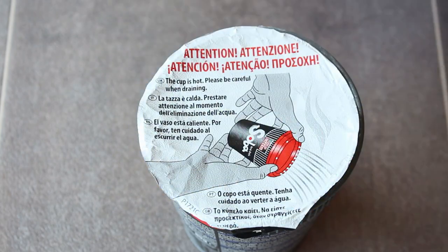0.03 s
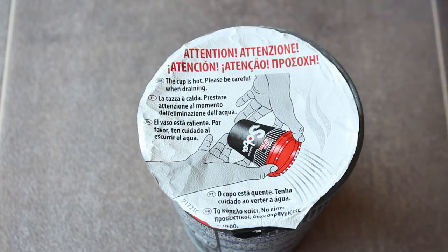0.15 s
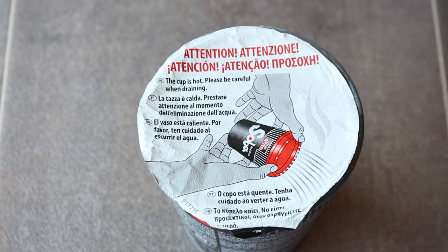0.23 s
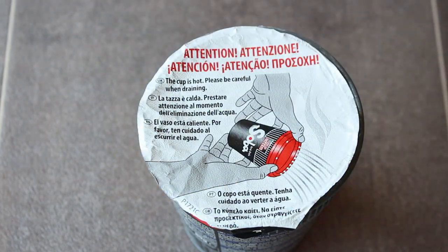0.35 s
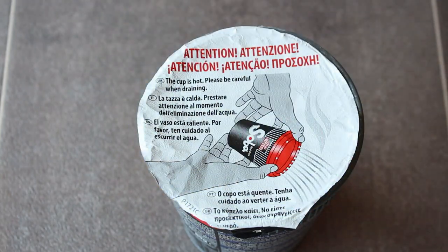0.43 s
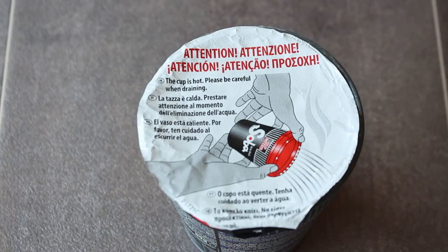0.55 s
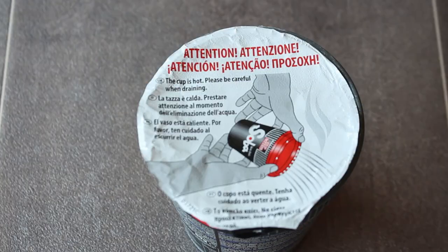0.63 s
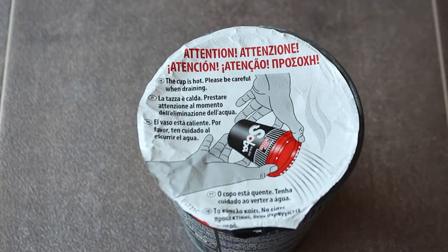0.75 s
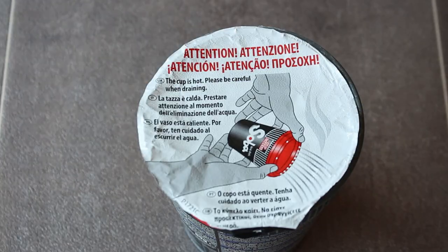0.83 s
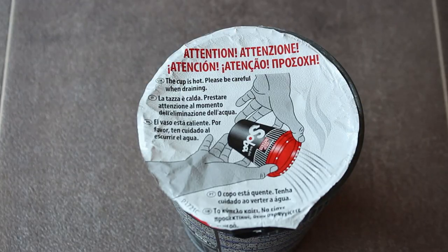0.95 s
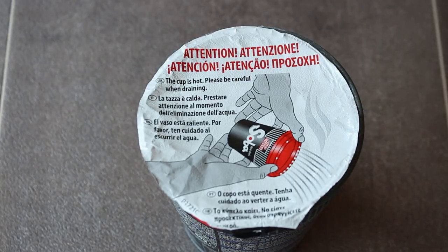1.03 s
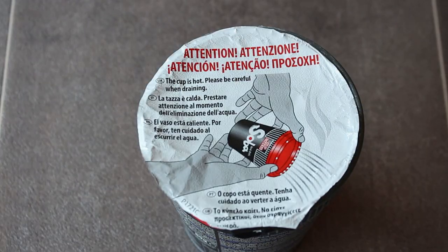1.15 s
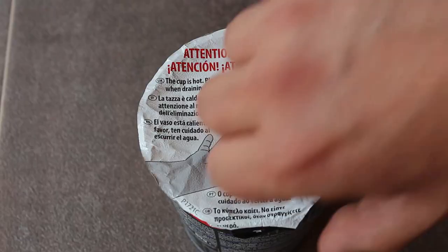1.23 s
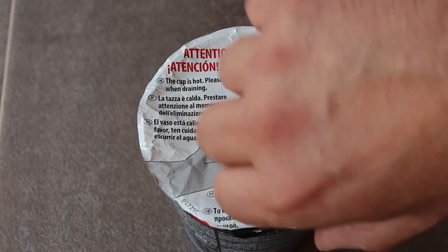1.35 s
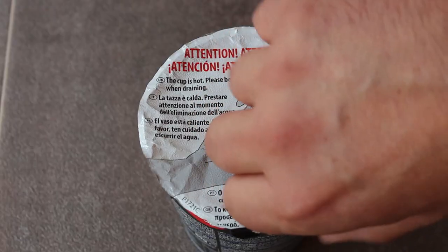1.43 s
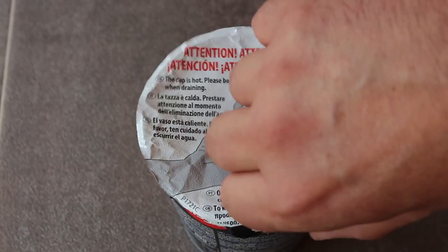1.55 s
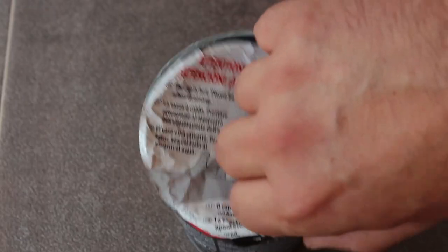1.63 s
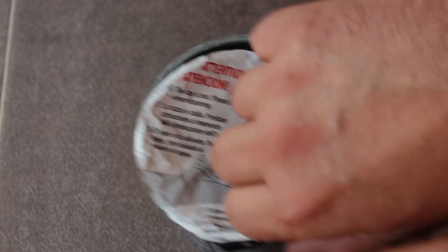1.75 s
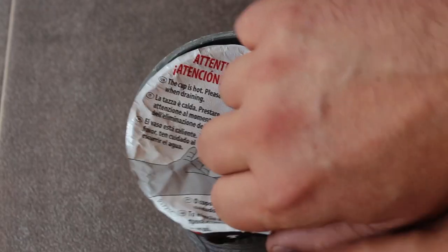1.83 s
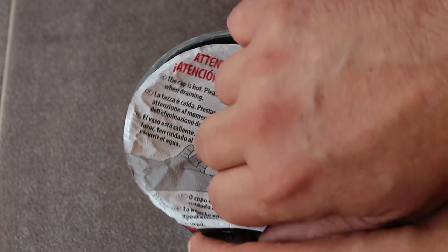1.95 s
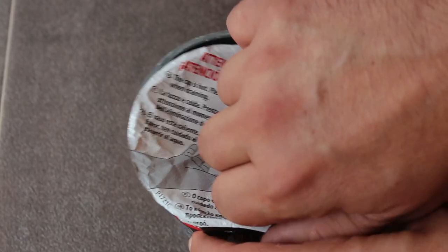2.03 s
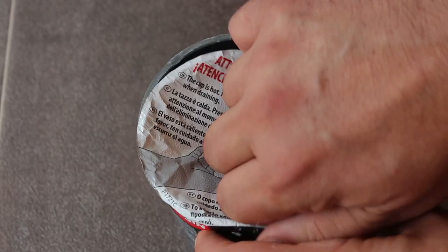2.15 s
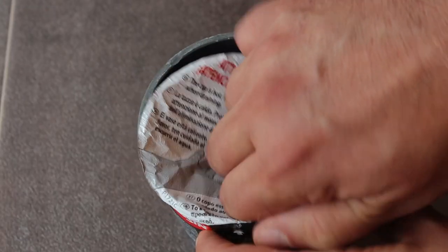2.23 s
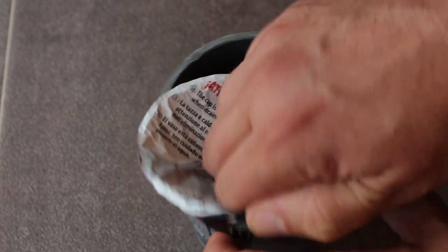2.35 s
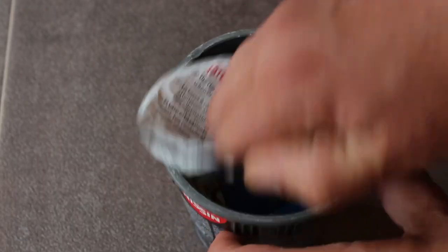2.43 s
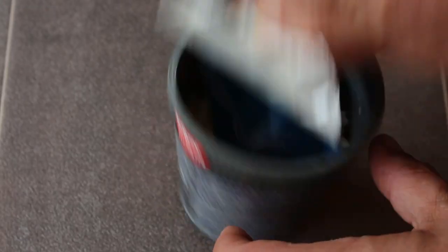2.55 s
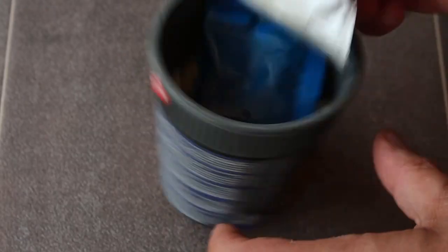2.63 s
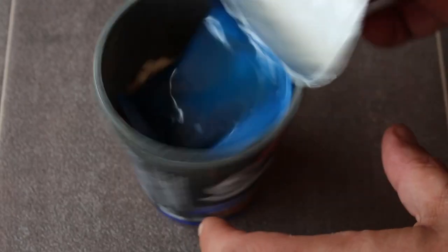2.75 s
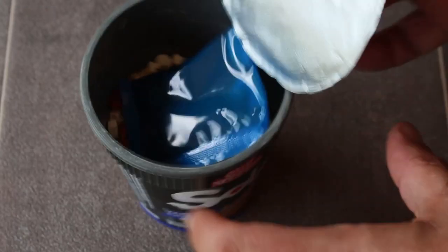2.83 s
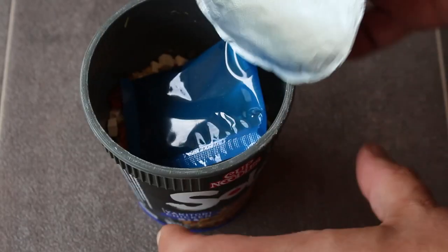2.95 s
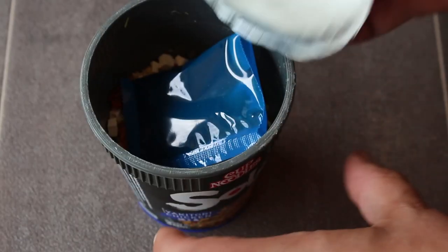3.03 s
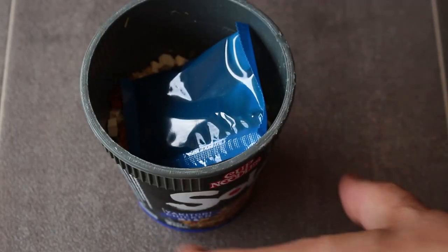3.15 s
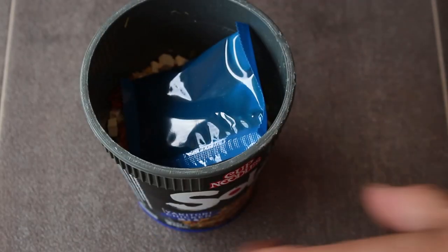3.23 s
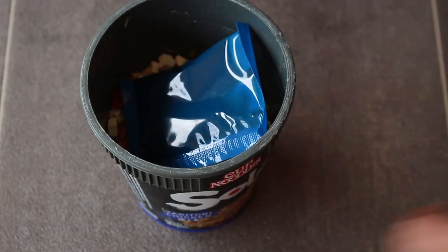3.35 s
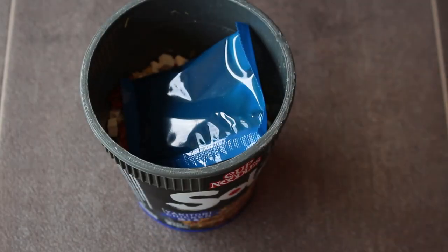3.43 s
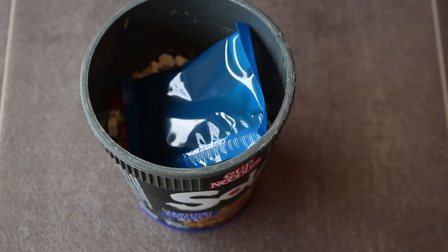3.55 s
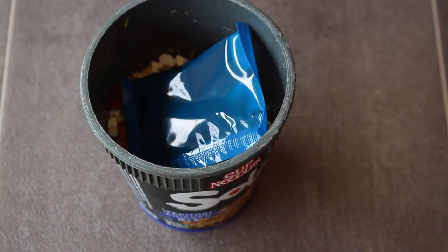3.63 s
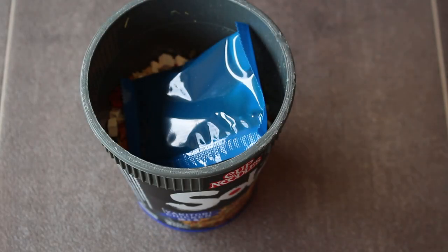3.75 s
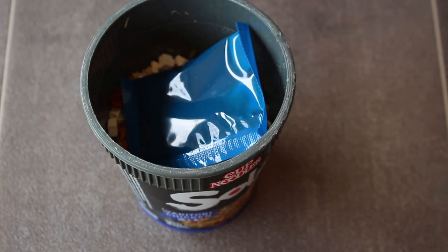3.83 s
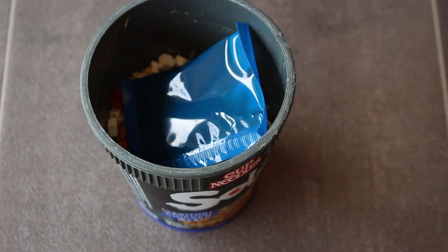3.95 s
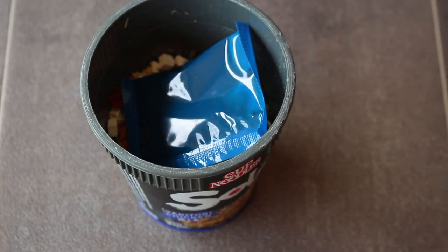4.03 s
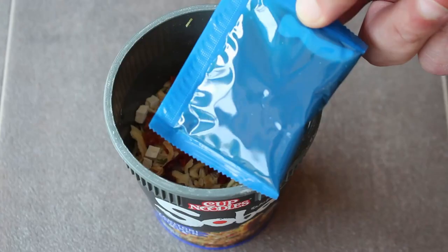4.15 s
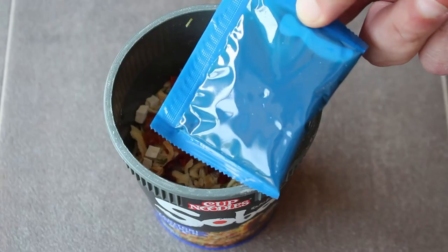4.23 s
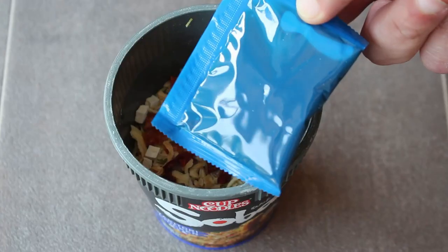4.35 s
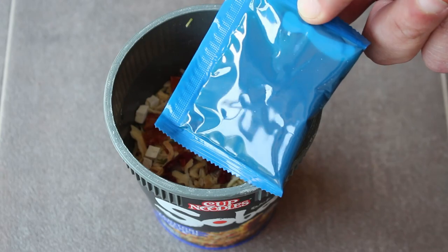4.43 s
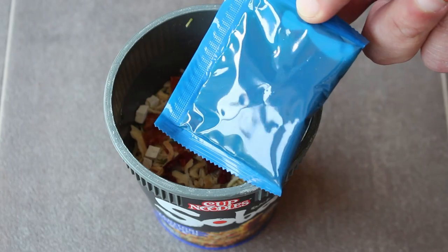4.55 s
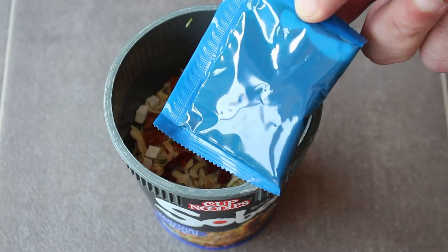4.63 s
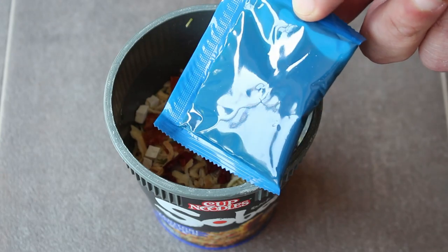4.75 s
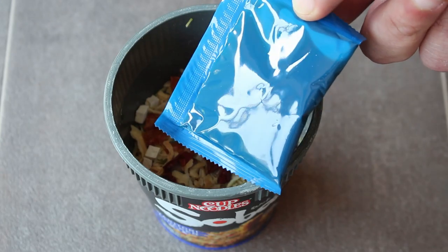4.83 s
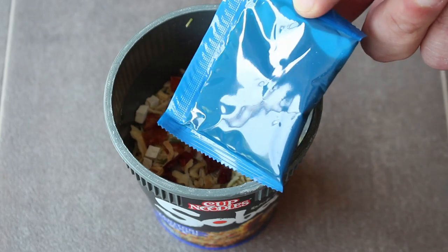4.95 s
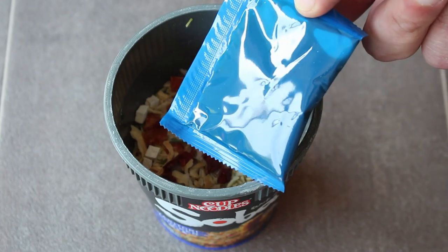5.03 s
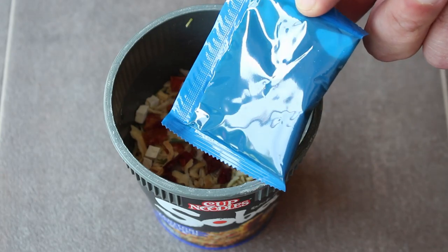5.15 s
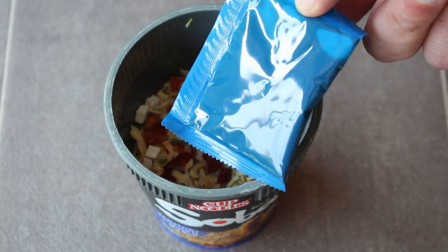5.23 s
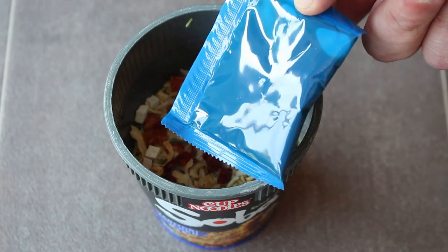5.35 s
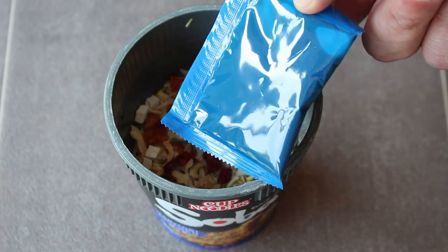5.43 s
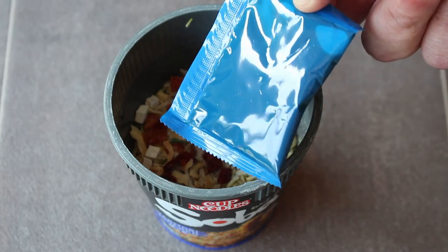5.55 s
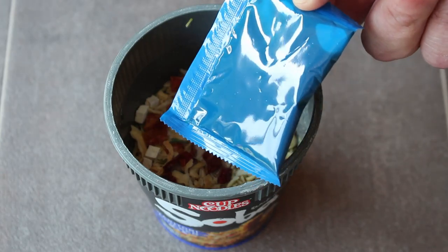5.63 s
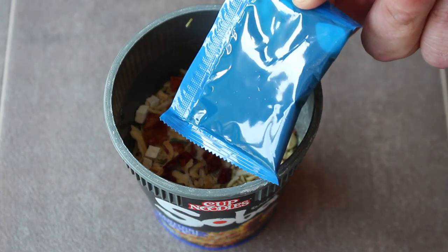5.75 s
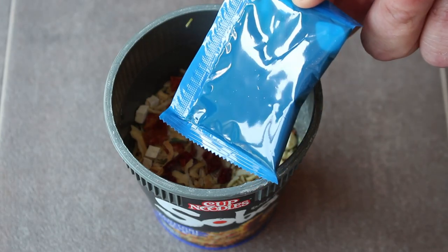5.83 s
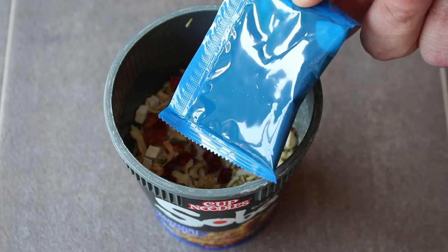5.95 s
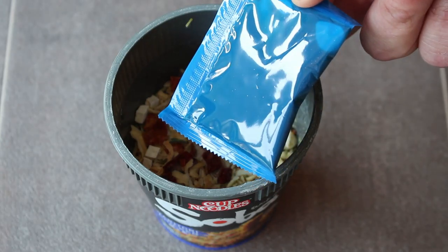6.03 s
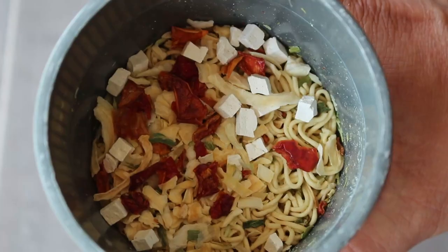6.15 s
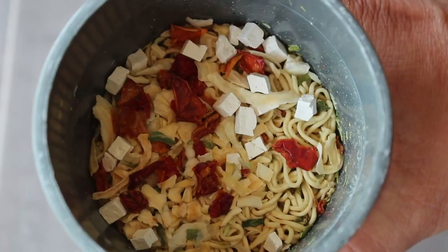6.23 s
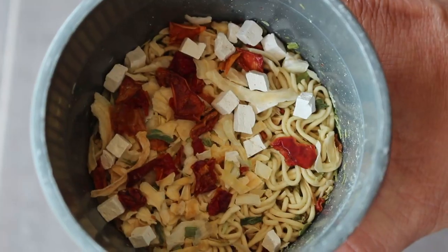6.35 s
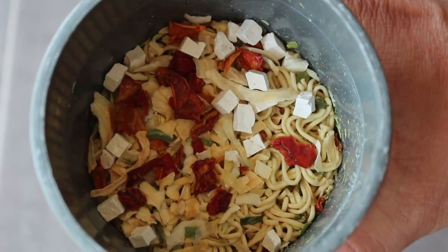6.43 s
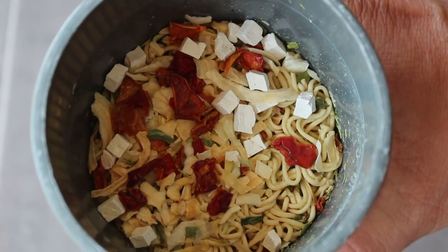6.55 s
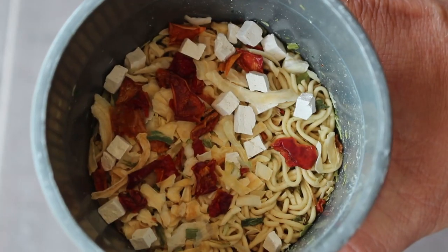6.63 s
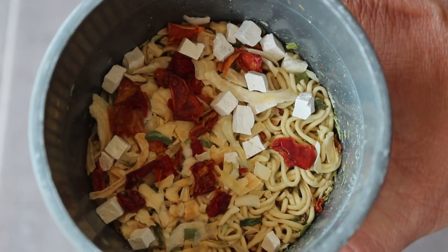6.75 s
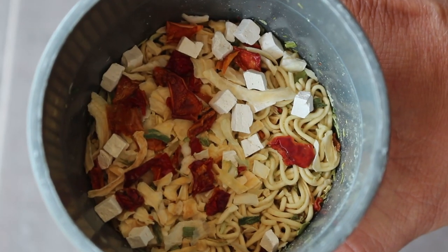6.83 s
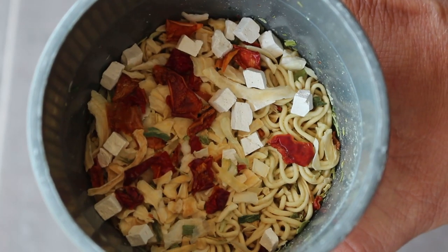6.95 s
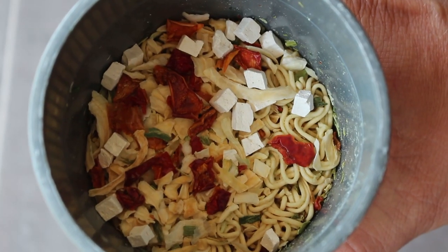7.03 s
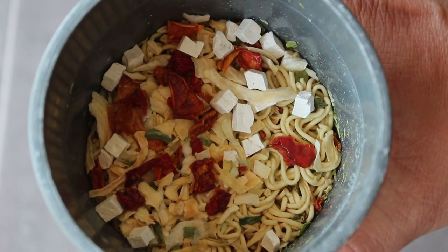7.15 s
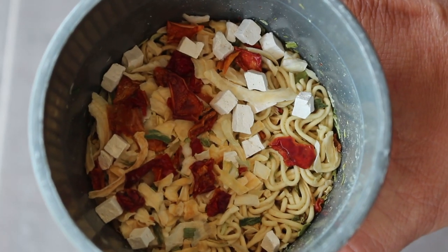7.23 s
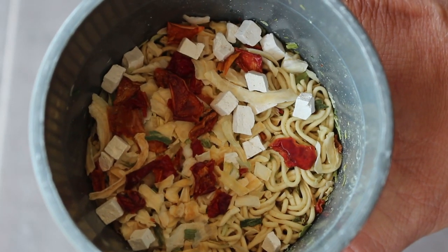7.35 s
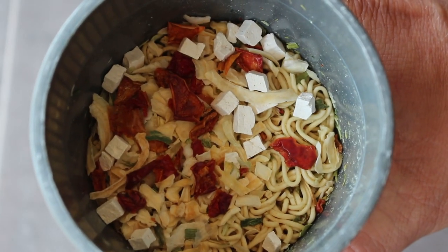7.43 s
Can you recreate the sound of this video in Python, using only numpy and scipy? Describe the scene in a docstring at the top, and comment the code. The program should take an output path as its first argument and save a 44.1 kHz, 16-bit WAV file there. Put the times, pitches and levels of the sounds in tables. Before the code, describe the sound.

Crisp foil tearing and popping seal on a hollow plastic cup, a low boom and knock, then soft taps and distant chirps in a quiet kitchen.

```python
"""Peeling the lid off a noodle pot

A foil-paper lid is peeled off a plastic pot on a kitchen counter. The glue seal gives way in snaps, short rips
and a steady crackle: clicks and bursts of tiny slips, coloured by filters for the foil and the ringing pot.
The pot wall booms in low modes and the open pot knocks on the counter. Small taps come before and after, made
of clicks with a short ring; gliding tones are birds outside, over filtered noise for air and two faint tones."""
import sys
import numpy as np
from scipy import signal
from scipy.fft import rfft, irfft
from scipy.io import wavfile
from scipy.ndimage import uniform_filter1d

SR = 44100
rng = np.random.default_rng(int(sys.argv[2]) if len(sys.argv) > 2 else 0)


def dump(signal):
    """Clip the signal to [-1, 1] and save it as 16-bit WAV at the path in sys.argv[1]."""
    limited = np.clip(np.atleast_2d(signal).T, -1, 1)
    pcm = np.round(limited * 32767).astype(np.int16)
    wavfile.write(sys.argv[1], SR, pcm)


N = 330750  # 7.5 s
T = np.arange(N) / SR
SIZE = 16384  # samples in one event

# how hard the seal is creeping open, one curve for each pull: (t/s, level of the crackle/dB)
PEEL = [
    [(1.49, -67), (1.52, -67.5), (1.656, -43), (1.854, -53), (2.024, -56), (2.11, -53.5)],
    [(2.125, -53.5), (2.261, -30), (2.361, -30), (2.569, -38.5), (2.66, -36)],
    [(2.705, -35), (2.863, -28), (2.903, -31), (3.02, -44)],
]
# colour of the sound that the foil gives off: (f/Hz, level/dB)
FOIL = [(40, -39.5), (110, -26.5), (220, -8.5), (400, -4.5), (600, -2), (1050, -6.5), (1600, -3),
        (4000, -3.5), (6000, -8.5), (10000, -14), (15500, -18.5)]
# resonances of the pot with its lid on: (f/Hz, width/Hz, lift/dB)
POT = [(513, 43, 6.5), (670, 37, 0.5), (802, 48, 3.5), (1346, 36, 5.5), (1426, 21, 4.5), (1538, 23, 8),
       (1840, 13, 1.5), (2200, 28, 4.5), (2444, 49, 5.5), (2961, 77, 3.5), (3050, 29, -0.5),
       (3570, 39, 0.5), (4050, 90, 6), (4360, 40, 5), (5280, 19, 4.5)]
# how bright a loose flap sounds: (flap ring f/Hz, tilt/dB per octave)
FLAP = [(520, -3), (1450, -4), (1750, 0), (2500, 0), (3000, 4), (4000, 2.5), (7500, 5)]


def undb(db):
    """Decibels to gain."""
    return 10 ** (np.asarray(db) / 20)


def unit(x):
    """Scale to an average (rms) level of 1."""
    return x / np.sqrt(np.mean(x ** 2) + 1e-30)


def freqs(x):
    """Frequency in Hz of each bin of the spectrum of x, kept above zero."""
    return np.maximum(np.fft.rfftfreq(len(x), 1 / SR), 1)


def on_log(f, points):
    """Read (Hz, value) points on a log-frequency axis."""
    hz, value = np.transpose(points)
    return np.interp(np.log(f), np.log(hz), value)


def colour(x, points, tilt_db=0):
    """Filter to the given spectrum, tilted about 2 kHz, without any sound ahead of its cause."""
    f = freqs(x)
    octaves = np.log2(np.maximum(f, 250) / 2000)
    level_db = on_log(f, points) + tilt_db * octaves
    # folding the cepstrum (spectrum of the log spectrum) forward gives the most prompt filter
    cepstrum = irfft(np.log(undb(level_db)), len(x))
    cepstrum[1:len(x) // 2] *= 2
    cepstrum[len(x) // 2 + 1:] = 0
    return irfft(rfft(x) * np.exp(rfft(cepstrum)), len(x))


def resonance(f, hz, width):
    """Response of one damped mode (one way of vibrating), 1 at its centre."""
    return 1 / (1 + 1j * (f * f - hz * hz) / (f * width))


def ring(x, modes):
    """Each mode lifts its own band and rings on; a negative dB value weakens the band instead."""
    f, spectrum = freqs(x), rfft(x)
    for hz, width, db in modes:
        spectrum = spectrum * (1 + (undb(db) - 1) * resonance(f, hz, width))
    return irfft(spectrum, len(x))


def band(x, lo_hz, hi_hz):
    """Keep only the band between two frequencies."""
    edges = [lo_hz, min(hi_hz, .45 * SR)]
    return signal.sosfilt(signal.butter(3, edges, "band", fs=SR, output="sos"), x)


def add(out, s, sound, db):
    """Mix an event in at time s, fading its second half; db is its level with the energy spread over 20 ms."""
    start = int(s * SR)
    sound = sound * np.minimum(np.linspace(2, 0, len(sound)), 1)
    sound = sound * undb(db) * np.sqrt(.02 * SR / np.sum(sound ** 2))
    out[start:start + len(sound)] += sound[:N - start]


def swell(t, rise_s, fall_s):
    """A rounded peak at t = 0 with exponential flanks."""
    return 1 / np.cosh(np.minimum(np.maximum(-t / rise_s, t / fall_s), 20))


def walk(size, per_s):
    """Smooth random wavering, spread 1."""
    step = int(SR / per_s)
    levels = np.repeat(rng.standard_normal(200), step)[:size]
    return unit(uniform_filter1d(levels, step))


def slips(size, per_s, spread_db):
    """Tiny breaks at random moments, most small and a few large."""
    breaks_now = rng.random(size) < per_s / SR
    strength = rng.exponential(size=size)
    sign = rng.choice([-1, 1], size)
    return unit(breaks_now * sign * undb(spread_db * np.minimum(strength, 4)))


def blow(decay_s, chatter):
    """A sharp click and the dying chatter of contacts behind it."""
    force = slips(SIZE, per_s=9000, spread_db=1) * np.exp(-T[:SIZE] / max(decay_s, 1e-4))
    force *= chatter / np.sqrt(np.sum(force ** 2))
    force[0] += 1
    return force


def background(rustle_hz=290, rustle_width=130):
    """Room air (noise), mains hum and a faint tone (sines), and a soft low rustle (noise through a mode)."""
    # colour of the room air; only its shape counts: (f/Hz, level/dB per Hz)
    air_colour = [(12, -31.5), (20, -5), (45, 3), (66, -10), (92, -0.5), (122, -13.5), (153, -6),
                  (185, -15), (289, -16.5), (416, -21), (519, -20), (3170, -31.5), (4070, -28.5),
                  (4680, -30.5), (15500, -31.5)]
    # soft low rustle, breath-like swells of noise: (t/s of the peak, level/dB)
    rustles = [(1.45, -54), (3.73, -62)]
    air_db = -60
    mains_hz, mains_db = 98.6, -69
    tone_hz, tone_db = 451.3, -75.5
    tone_on_s, tone_off_s, tone_fade_s = 0.52, 2.8, .06
    rustle_rise_s, rustle_fall_s = 0.062, .04

    air = unit(colour(rng.standard_normal(N), air_colour)) * undb(air_db)
    mains = np.sqrt(2) * np.sin(2 * np.pi * mains_hz * T) * undb(mains_db)
    sounding = np.clip(np.minimum(T - tone_on_s, tone_off_s - T) / tone_fade_s, 0, 1)
    tone = np.sqrt(2) * np.sin(2 * np.pi * tone_hz * T) * undb(tone_db) * sounding
    rustle_filter = resonance(freqs(T), rustle_hz, rustle_width) ** 2
    rustle = unit(irfft(rfft(rng.standard_normal(N)) * rustle_filter, N))
    rustle_level = sum(undb(db) * swell(T - s, rustle_rise_s, rustle_fall_s) for s, db in rustles)
    return air + mains + tone + rustle * rustle_level


def birds(waver_hz=190, echo_s=.05, bend=0.65):
    """Rough chirps that glide fast and then level out, smeared by the walls on their way in."""
    # a bird outside repeats a falling call: (t/s, length/s, start f/Hz, level/dB)
    falling_calls = [(.43, 0.064, 4350, -72), (1.187, 0.081, 4250, -65), (4.225, 0.15, 4405, -59.5),
                     (5.437, .16, 4476, -61), (6.139, 0.067, 3660, -59), (7.10, .05, 5150, -72),
                     (7.422, .12, 4190, -60.5)]
    # short rising chips between the calls: (t/s, start f/Hz, level/dB)
    rising_chips = [(0.637, 4420, -72), (.835, 4530, -70), (4.03, 3900, -75), (6.45, 4850, -74),
                    (6.545, 3800, -67.5), (7.196, 3934, -63.5)]
    call_fall_hz_per_s = 9000  # averaged over a call
    chip_s, chip_rise = 0.0425, 0.07  # length; rise as a share of the pitch

    out, t = np.zeros(N), T[:SIZE]
    calls = [(s, length, hz, hz - call_fall_hz_per_s * length, db) for s, length, hz, db in falling_calls]
    chips = [(s, chip_s, hz, hz * (1 + chip_rise), db) for s, hz, db in rising_chips]
    for s, length, start_hz, end_hz, db in calls + chips:
        progress = np.minimum(t / length, 1)
        glide = start_hz + (end_hz - start_hz) * progress ** bend
        waver = waver_hz * unit(uniform_filter1d(rng.standard_normal(SIZE), size=60))
        loudness = np.sqrt(np.abs(np.sin(np.pi * progress)))
        chirp = loudness * np.sin(2 * np.pi * np.cumsum(glide + waver) / SR)
        echoes = rng.standard_normal(SIZE) * np.exp(-t / echo_s)
        heard = signal.fftconvolve(chirp, echoes)[:SIZE]
        add(out, s, heard, db + 10 * np.log10(length / .02))  # level over the call, not over 20 ms
    return out


def taps(ring_width=.2, ring_db=9):
    """Dull light contacts on the counter, each with one short woody ring."""
    # small taps about the kitchen: (t/s, level/dB, decay/s, tilt/dB per octave, ring f/Hz)
    contacts = [(0.758, -57.5, 0.0061, 1.5, 2070), (1.2847, -61, .003, 8, 4380),
                (3.465, -59.5, 0.021, 11.5, 3800), (4.306, -57.5, .006, -3.5, 900),
                (4.611, -43.5, 0.025, -2.5, 910), (4.648, -51, 0.023, -4.5, 1650)]
    # colour of a tap before its tilt: (f/Hz, level/dB)
    tap_colour = [(100, -27), (240, -1), (400, -9), (510, -2), (720, -8), (880, -4.5), (1150, -6.5),
                  (1650, -4.5), (2500, -11), (4200, -21), (7000, -39.5), (15000, -58)]

    out = np.zeros(N)
    for s, db, decay_s, tilt_db, hz in contacts:
        tap = colour(blow(decay_s, chatter=5.5), tap_colour, tilt_db)
        add(out, s, ring(tap, [(hz, ring_width * hz, ring_db)]), db)
    return out


def knocks(first_tilt_db=-.5):
    """The open pot knocks and settles; without its lid it rings more strongly."""
    # moments of the knocks: (t/s, level/dB)
    hits = [(2.9415, -18), (2.953, -34), (2.972, -28.5), (3.0187, -29.5), (3.041, -33)]
    # resonances of the pot without its lid: (f/Hz, width/Hz, lift/dB)
    open_modes = [(670, 48, 14.5), (1014, 50, 9.5), (1410, 19, 11.5), (2016, 65, 18.5), (3120, 59, 14),
                  (3620, 60, 0), (3860, 140, 9), (4320, 250, 8), (4660, 104, 5), (5700, 84, 8),
                  (6520, 130, 11)]
    # colour of a knock before its tilt: (f/Hz, level/dB)
    knock_colour = [(30, -13.5), (70, 6), (130, 0), (400, -10.5), (1000, -2.5), (4000, -0.5), (7000, -4),
                    (15000, -15.5)]
    decay_s = 0.0093
    dulling = 0.13  # a softer knock is duller: dB per octave for each dB under the first

    out = np.zeros(N)
    for s, db in hits:
        tilt_db = first_tilt_db + dulling * (db - hits[0][1])
        knock = colour(blow(decay_s, chatter=12), knock_colour, tilt_db)
        add(out, s, ring(knock, open_modes), db)
    return out


def flexes(low_hz=50, high_hz=420):
    """Soft uneven pushes set the low modes of the thin wall booming; the holding hand soon damps them."""
    # the pot wall flexes under the hand: (t/s, level/dB, push length/s)
    pushes = [(1.49, -44.5, .008), (1.609, -41, .012), (1.666, -39, 0.017), (1.828, -52, 0.055),
              (2.35, -30, 0.037), (2.421, -37.5, 0.023), (2.595, -40, .033), (2.794, -31.5, 0.019),
              (2.835, -30.5, 0.023), (2.877, -26.5, 0.023), (2.907, -18, 0.015), (2.925, -23, 0.021),
              (3.066, -48, 0.071)]
    # low modes of the wall: (f/Hz, width/Hz, level/dB)
    wall_modes = [(75, 8.5, 6), (111.57, 5.5, -1.5), (135, 12, -2.5), (177, 3.9, -15), (232, 22, -9.5),
                  (325, 60, -19)]
    hand_damp_s = .05

    out, t = np.zeros(N), T[:SIZE]
    wall = sum(undb(db) * resonance(freqs(t), hz, width) for hz, width, db in wall_modes)
    for s, db, push_s in pushes:
        push = band(blow(push_s, chatter=1.3), low_hz, high_hz)
        add(out, s, irfft(rfft(push) * wall) * np.exp(-t / hand_damp_s), db)
    return out


def lid(force, flap_hz, flap_db, tilt_db, top_db, flap_width=0.19):
    """Foil and pot sound a force; the loose flap adds one broad ring, and crisp creases lift the top."""
    foil = [(hz, db + top_db * (hz > 8000)) for hz, db in FOIL]
    flap = (flap_hz, flap_width * flap_hz, flap_db)
    return ring(colour(force, foil, tilt_db), POT + [flap])


def crackle(size, surge_db=3.5, facet_db=8):
    """Facets of the crumpling foil crackle in surges of their own, each with its own ring."""
    out = 0
    for facet_hz in (1627, 2380, 3240, 4050, 5232, 8125):
        force = slips(size, per_s=900, spread_db=1.5) * undb(surge_db * walk(size, per_s=60))
        out = out + ring(force, [(facet_hz, facet_hz / 6, facet_db)])
    return ring(colour(out, FOIL), POT)


def peeling(wall_db=-6, foil_db=-2, fizz_db=-9, edge_s=.012):
    """The seal creeps open in a stream of slips that shake pot wall and foil together."""
    out = np.zeros(N)
    for pull in PEEL:
        s, db = np.transpose(pull)
        span = slice(int((s[0] - edge_s) * SR), int((s[-1] + edge_s) * SR))
        t = T[span]
        tear = crackle(2 * SIZE)[:len(t)]
        wall = undb(wall_db) * unit(band(tear, 120, 1400))
        foil = undb(foil_db) * unit(band(tear, 1200, 6600))
        fizz = undb(fizz_db) * unit(band(tear, 6000, 17000))
        fade = np.clip(np.minimum(t - t[0], t[-1] - t) / edge_s, 0, 1)
        out[span] += (wall + foil + fizz) * fade * undb(np.interp(t, s, db))
    return out


def crinkles(count=14, above_db=-4, spread_db=2.5, decay_s=.0008, ring_db=10, low_hz=1400, high_hz=8000):
    """Small creases flip at random in each pull: lone ticks, each with its own ring, that grow with the pull."""
    out = np.zeros(N)
    for pull in PEEL:
        s, db = np.transpose(pull)
        for when, pitch, strength in rng.random((count, 3)):
            at = s[0] + when * (s[-1] - s[0])
            hz = low_hz * (high_hz / low_hz) ** pitch
            level_db = np.interp(at, s, db) + above_db + spread_db * (2 * strength - 1)
            tick = lid(blow(decay_s, chatter=1), hz, ring_db, on_log(hz, FLAP), 0)
            add(out, at, tick, level_db)
    return out


def rips(lead=.08):
    """The tear speeds up along the rim and stalls again: a swell of dense slips."""
    # quick runs of the tear and rustles: (t/s of the peak, level/dB, rise/s, flap ring f/Hz, ring/dB)
    runs = [(1.508, -25, 0.0081, 518.7, 9.5), (1.54, -34, 0.007, 300.8, 8), (1.6, -24.5, 0.0047, 4290, 5),
            (1.621, -14, 0.0074, 2850, 6), (1.681, -28.5, 0.015, 499.2, 7), (1.732, -26.5, 0.0047, 4087, 6),
            (1.80, -41, .035, 4294, 2.5), (2.16, -35.5, 0.021, 3948, 4.5), (2.269, -28, 0.0079, 4000, 9),
            (2.329, -21, 0.0066, 1650, 6.5), (2.367, -22, 0.011, 1598, 8.5),
            (2.48, -23.5, 0.0073, 622.4, 8), (2.511, -13.8, 0.0099, 672, 10.5),
            (2.582, -24, .011, 1600, 6.5), (2.714, -21.5, .005, 4250, 10.5),
            (2.781, -24.5, 0.0076, 3018, 3.5), (2.837, -19, .0035, 5565, -8),
            (2.883, -30.5, 0.0067, 10980, 6.5), (3.236, -46.5, .008, 3040, 16)]
    stall = 1.15  # fall time over rise time
    usual_db, usual_tilt_db, top_db = -22, 0.26, 0.8  # level; its tilt per octave; lift of the top
    brightening = 0.1  # a stronger rip is brighter: dB per octave for each dB of level

    out, t = np.zeros(N), T[:SIZE] - lead
    for s, db, rise_s, hz, ring_db in runs:
        force = swell(t, rise_s, stall * rise_s) * slips(SIZE, per_s=6000, spread_db=3.0)
        tilt_db = usual_tilt_db + brightening * (db - usual_db)
        add(out, s - lead, lid(force, hz, ring_db, tilt_db, top_db), db)
    return out


def snaps(top_db=0.0, loud_db=-20, loud_dulling=0.63):
    """The seal lets go at one spot, and at last the lid is laid down: the flap sets the colour, and the biggest
    breaks have less top."""
    # breaks of the seal and buckles of the foil, and last the peeled lid laid down: (t/s, level/dB, decay/s,
    # flap ring f/Hz, ring/dB)
    breaks = [(1.4806, -37, 0.00201, 1416, 4), (1.4841, -25.5, 0.0024, 1565, 5.5),
              (1.487, -23, .005, 520, 15), (1.5011, -18.5, 0.0018, 1550, 15),
              (1.518, -24.5, .0015, 1500, 5.5), (1.527, -24, .003, 1428, 8), (1.562, -21, .0011, 1643, 15),
              (1.664, -29.5, 0.004, 330, 7.5), (1.7033, -27.5, .0033, 4047, 9),
              (1.712, -28.5, 0.0036, 4022, 8.5), (1.988, -51.5, 0.0037, 2240, 3),
              (2.009, -34.5, .006, 4111, 7.5), (2.1189, -13, .0018, 2586, 1), (2.186, -32, .002, 4000, 7),
              (2.1935, -29.5, 0.0034, 3939, 7), (2.26, -32, 0.0027, 1500, 7.5),
              (2.273, -29, .003, 4000, 9.5), (2.292, -32, .001, 6000, 2.5), (2.3068, -30, .001, 7500, 6),
              (2.378, -23, 0.0024, 2500, 0), (2.406, -32.5, .002, 3942, 5), (2.468, -28.5, .003, 1498, 3),
              (2.688, -33.5, .003, 2200, 6.5), (2.7048, -25, .003, 3000, 7.5),
              (2.709, -9.5, .0025, 3013, 13), (2.768, -35, .003, 3070, -1), (2.796, -27, .004, 775, 10),
              (3.2032, -36.5, 0.016, 2680, 4)]

    out = np.zeros(N)
    for s, db, decay_s, hz, ring_db in breaks:
        top = top_db - loud_dulling * max(db - loud_db, 0)
        snap = lid(blow(decay_s, chatter=3.8), hz, ring_db, on_log(hz, FLAP), top)
        add(out, s, snap, db)
    return out


def kitchen(x, early_db=-11, early_s=.01, late_db=-16):
    """Quick reflections from counter and wall, then the tail of a tiled room, both as fading noise."""
    # time the room takes to fade by 60 dB: (f/Hz, fade time/s)
    room_fade = [(100, 0.5), (500, .5), (2000, 0.44), (4000, 0.42), (8000, 0.14), (15000, 0.21)]

    t, tail = T[:SR], 0
    for hz in 62.5 * 2 ** np.arange(9):  # one octave band at a time
        noise = band(rng.standard_normal(SR), hz / np.sqrt(2), hz * np.sqrt(2))
        tail = tail + noise * undb(-60 * t / on_log(hz, room_fade))
    tail = unit(tail * np.minimum(t / 0.018, 1))
    early = unit(rng.standard_normal(SR) * np.exp(-t / early_s) * (t > .002))
    echoes = (undb(early_db) * early + undb(late_db) * tail) / np.sqrt(SR)
    return x + signal.fftconvolve(x, echoes)[:N]


def scene():
    """All sits near the middle; the wall's boom is a little to the left, and mic noise differs by side."""
    # what differs between the sides; only its shape counts: (f/Hz, level/dB per Hz)
    mic_colour = [(25, 6), (100, 5), (200, 5), (1000, 1), (4000, 1), (15000, 1)]

    boom = flexes()
    indoors = taps() + knocks() + boom + peeling() + crinkles() + rips() + snaps()
    mid = background() + birds() + kitchen(indoors)
    mic_noise = undb(-68.0) * unit(colour(rng.standard_normal(N), mic_colour))
    side = mic_noise + undb(-35) * boom
    return np.array([mid + side, mid - side])


def record(dry):
    """Peaks beyond full scale are clipped; then the top above 15.8 kHz is cut."""
    top_cut = signal.ellip(12, .1, 70, 15800, fs=SR, output="sos")
    return signal.sosfilt(top_cut, np.clip(dry, -1, 1))


dry = scene()
out = record(dry)
dump(out)
```